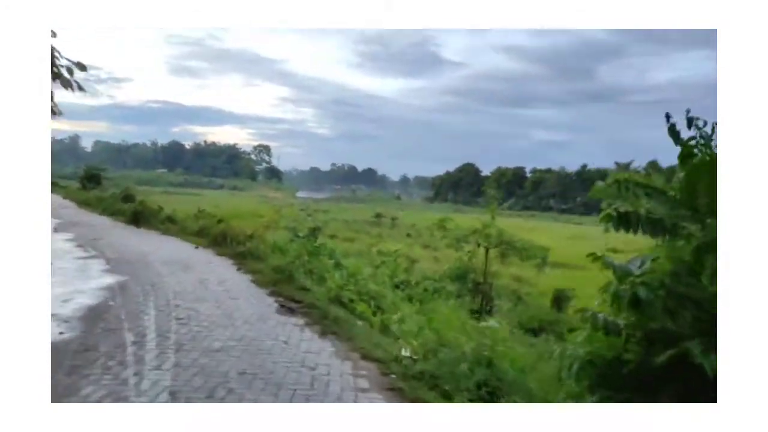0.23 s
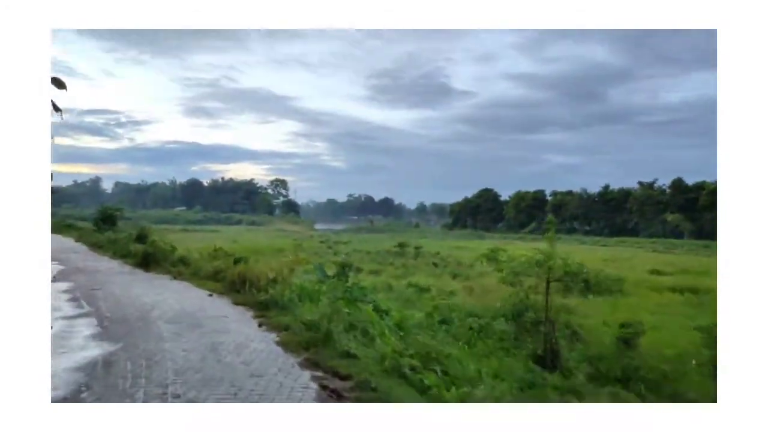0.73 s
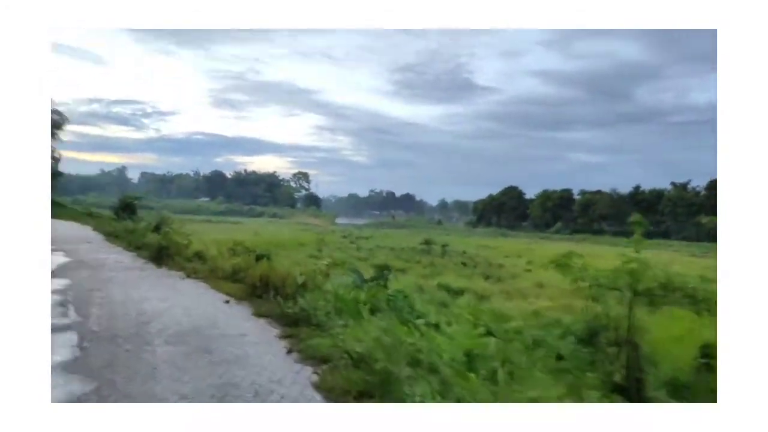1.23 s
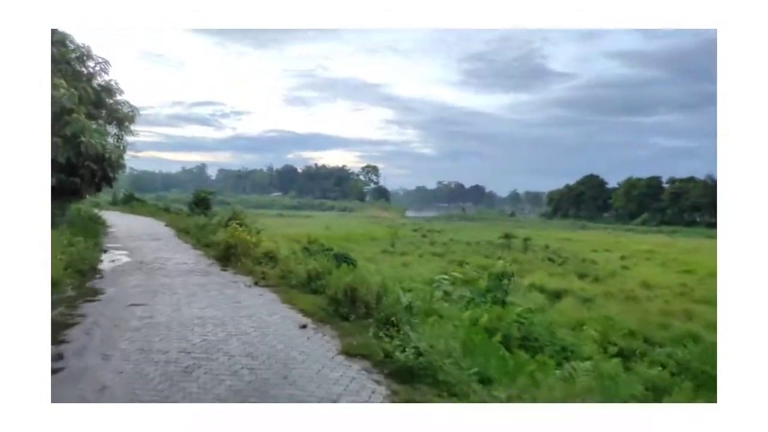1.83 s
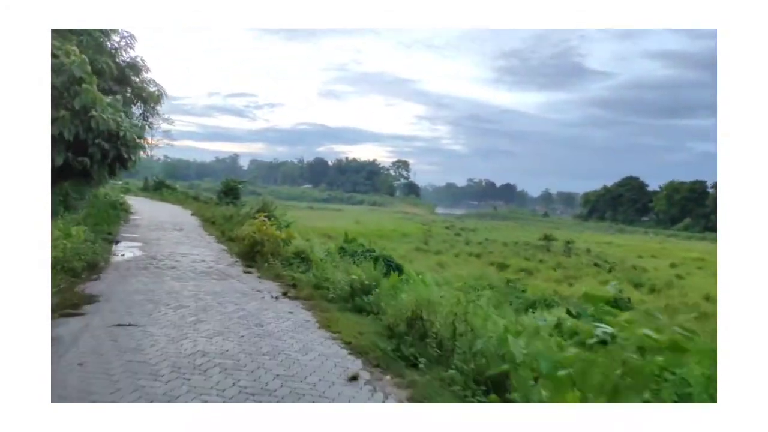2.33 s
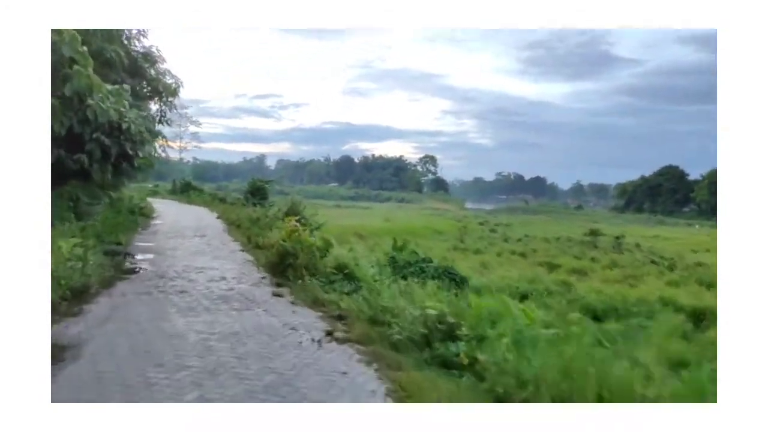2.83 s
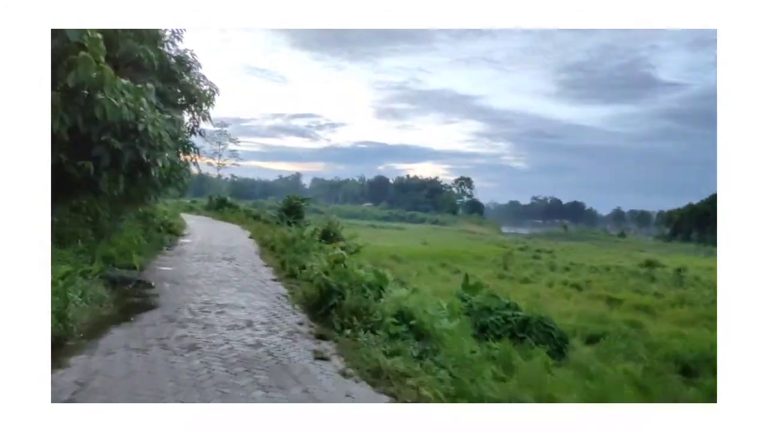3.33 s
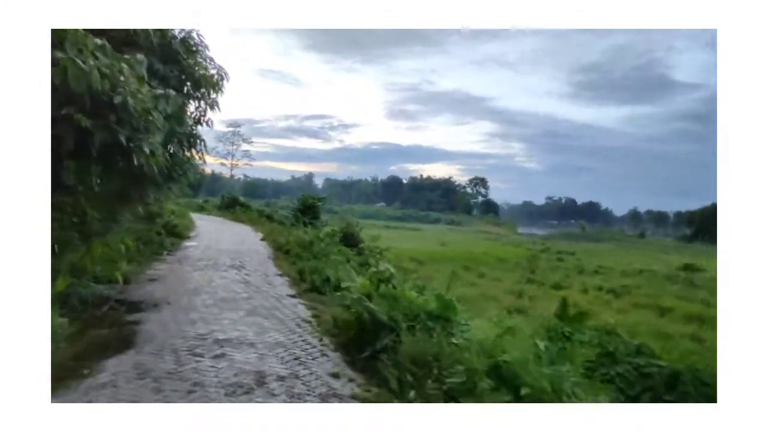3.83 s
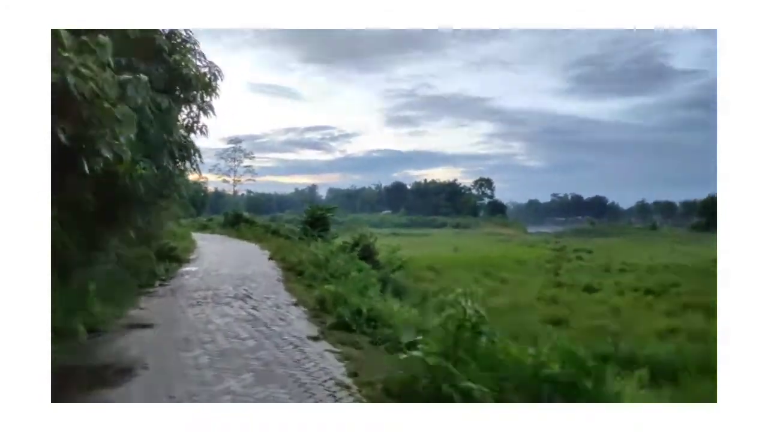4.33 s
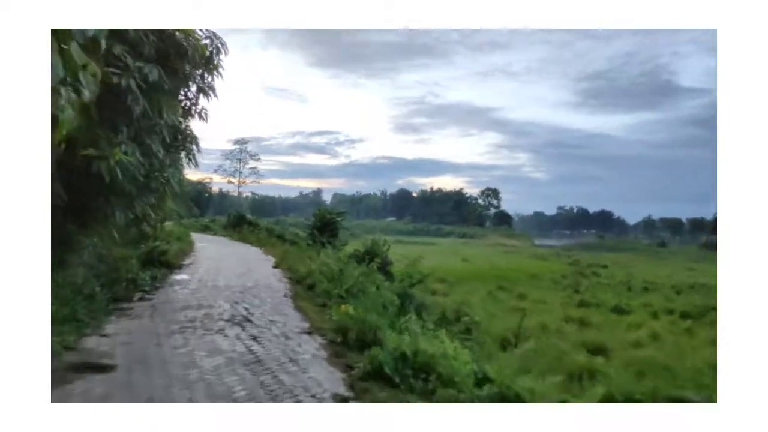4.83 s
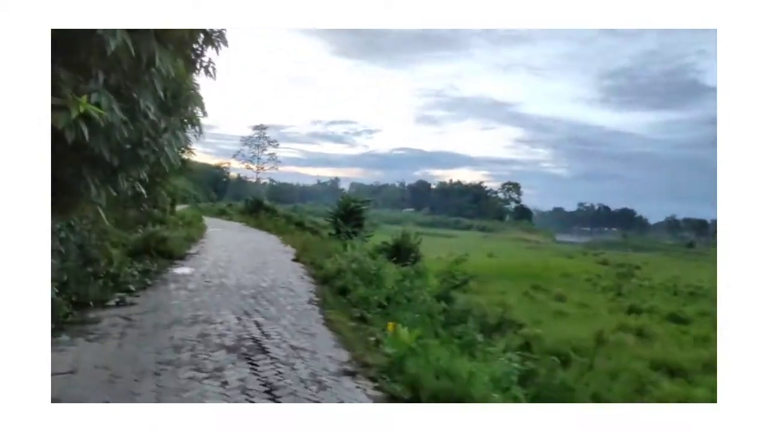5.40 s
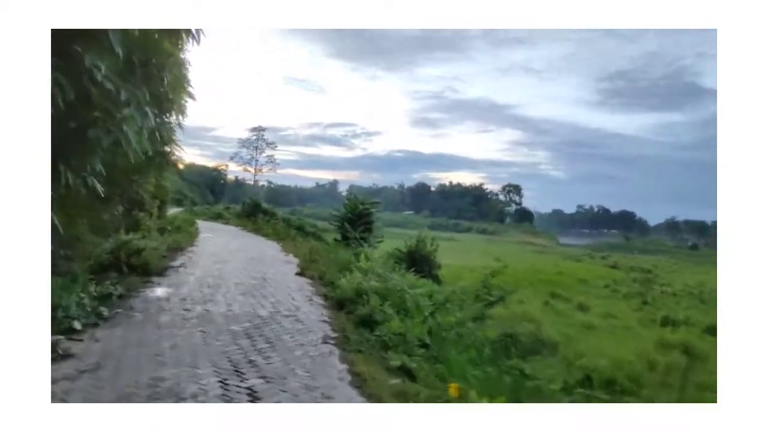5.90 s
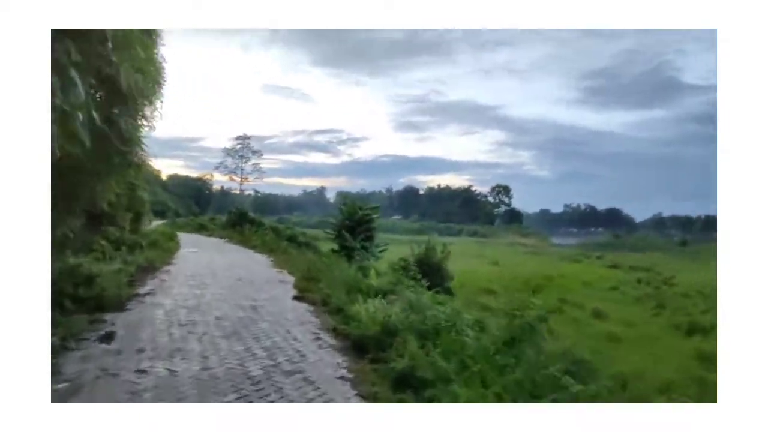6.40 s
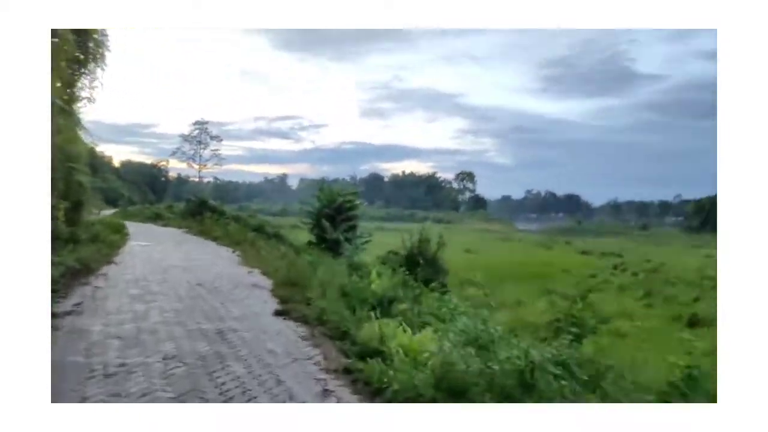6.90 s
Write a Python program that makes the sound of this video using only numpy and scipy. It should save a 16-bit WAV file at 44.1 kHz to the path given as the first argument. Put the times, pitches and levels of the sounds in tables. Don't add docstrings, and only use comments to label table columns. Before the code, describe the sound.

Onboard a little motorbike: low chugging exhaust, clattering engine, shrill insects from the verge and growing wind buffeting, with the engine easing off near the end.

```python
import sys
import numpy as np
from scipy import signal
from scipy.fft import rfft, irfft, next_fast_len
from scipy.io import wavfile
from scipy.ndimage import map_coordinates

SR = 44100
rng = np.random.default_rng(int(sys.argv[2]) if len(sys.argv) > 2 else 0)


def bounce(signal):
    frames = np.transpose(np.atleast_2d(signal))
    limited = np.clip(frames, -1, 1)
    pcm = np.round(limited * 32767).astype(np.int16)
    wavfile.write(sys.argv[1], SR, pcm)


def field_ratio(decibels):
    return 10 ** (np.asarray(decibels, dtype=float) / 20)


N = 315315

# (frequency [Hz], left density [dB per Hz], right density [dB per Hz])
CHORUS = [(4130, -99, -99), (4530, -96, -93.5), (5200, -88.5, -93.5), (5260, -89.5, -92.5),
          (5800, -82, -89.5), (6050, -82.5, -87), (6300, -84.5, -89), (6560, -83.5, -88),
          (6770, -82, -80.5), (7010, -83.5, -83), (7180, -89, -83.5), (7590, -91, -83),
          (8250, -90.5, -93.5)]
# (time [s], low band [dB], high band [dB])
CHOIRS = [(0, -1, -1.1), (2, -0.5, -1.1), (3.5, -.5, -0.28), (5, .5, 0.59), (6.2, 1, 1.5), (6.6, 0, -0.25),
          (7.15, -3.5, 0.17)]
CHOIR_SPLIT_HZ = 6550
# (start [s], end [s], pitch [Hz], left level [dB], right level [dB])
TRILLS = [(-.1, .3, 6860, -56, -60), (1.575, 1.95, 6800, -55, -59), (2.407, 3.298, 6900, -59, -60),
          (2.498, 3.2, 6700, -63, -61), (3.45, 3.95, 6850, -58, -57), (3.951, 4.404, 6600, -57, -69),
          (3.993, 4.754, 6820, -55, -71), (4.855, 5.4, 6850, -56, -67), (5.555, 6.55, 6730, -53.5, -63),
          (5.6, 6.05, 6780, -55, -62), (5.9, 6.55, 6800, -53, -61), (6.6, 7.3, 6720, -58, -65),
          (5.4, 7.3, 3790, -66, -74)]
# (start [s], end [s], pitch [Hz], chirp rate [per s], level [dB])
SOLOISTS = [(-.069, .13, 6380, 29, -57), (.244, .32, 6860, 28.8, -54), (.313, .55, 6860, 28.8, -49),
            (.556, .69, 6860, 28.8, -53), (.62, .93, 6330, 28.9, -56.5), (.937, 1.04, 6310, 28.95, -48.5),
            (1.04, 1.355, 6310, 28.95, -49.5), (1.056, 1.16, 6790, 29.2, -49),
            (1.193, 1.33, 6790, 29.2, -50), (1.33, 1.572, 6800, 29.2, -48.5),
            (1.198, 1.37, 7020, 29.2, -58), (1.369, 1.57, 7020, 29.2, -55), (5.94, 6.32, 6490, 27.2, -52)]
CHIRPS_PER_S, CHIRP_SPREAD_PER_S, SHADE_DB = 31, 2.1, -12

# (time [s], level [dB])
HEADWIND = [(0, -39), (.35, -37.5), (.8, -34.5), (1.1, -39), (1.4, -36), (2, -34.5), (3, -34.5),
            (3.65, -34), (4.3, -32.5), (5, -30.5), (5.6, -32.5), (6.1, -30), (6.45, -29), (6.75, -26.5),
            (7.15, -27.5)]
# (centre [s], half length [s], rise [dB])
GUSTS = [(.3, 0.23, 10), (.98, 0.038, 10), (1.782, 0.031, 16.5), (1.87, 0.084, 7.5), (2.21, 0.021, 7),
         (2.29, 0.046, 10.5), (2.75, 0.063, 9), (3.33, 0.036, 2), (3.87, 0.091, 11.5), (4.55, 0.036, 6),
         (4.86, 0.039, 2), (5.04, 0.034, 4), (5.24, .03, -1), (5.742, 0.0075, 15), (5.82, 0.043, 7),
         (5.97, 0.12, 3), (6.11, 0.012, 14), (6.21, 0.027, 9), (6.53, 0.015, -5), (6.76, 0.039, 5),
         (6.985, 0.035, 6), (7.08, 0.011, 8.5)]
# (centre [s], half length [s], rise [dB])
SIDE_GUSTS = [(1.36, .06, 4), (2, .06, 4), (3.1, .15, 4), (4.75, .15, 3), (5.4, .12, 6), (5.97, .13, 10),
              (6.52, .1, 9.5), (6.78, .06, 11)]
# (frequency [Hz], density [dB per Hz])
THUD_SPECTRUM = [(12, -3.5), (25, -7), (45, -0.5), (80, -0.5), (110, -6), (160, -29), (300, -65)]
# (frequency [Hz], density [dB per Hz])
FLUTTER_SPECTRUM = [(60, -27.5), (100, -0.5), (140, -1.5), (200, -7.5), (300, -13.5), (450, -26),
                    (800, -42), (1500, -73)]
# (frequency [Hz], density [dB per Hz])
LEE_THUD_SPECTRUM = [(10, -20), (24, -2), (45, 0), (65, -5), (90, -13), (150, -23), (300, -38), (1200, -90)]
# (frequency [Hz], density [dB per Hz])
LEE_FLUTTER_SPECTRUM = [(50, -19.5), (90, -1), (160, -1), (280, -6.5), (450, -15.5), (800, -36.5),
                        (1500, -68.5)]
# (time [s], level [dB])
LEE_FLUTTER = [(0, -61.5), (4, -56.5), (5.9, -52), (6.3, -47.5), (7.15, -45)]
# (time [s], peak [dB], pitch [Hz])
PUFFS = [(0.416, -20.5, 130), (0.57, -17, 86), (0.967, -14, 87), (1.783, -7, 147), (2.216, -10.5, 110),
         (2.267, -21, 117), (2.288, -18, 173), (2.728, -20, 87), (2.766, -13.5, 133), (2.927, -20.5, 116),
         (3.029, -16.5, 99), (3.318, -15, 115), (3.369, -16.5, 102), (3.756, -23, 100), (3.783, -19, 116),
         (3.802, -11.5, 98), (3.847, -19, 178), (3.862, -14.5, 116), (4.131, -18, 98), (4.518, -16.5, 150),
         (4.55, -16, 87.5), (4.804, -13, 85), (4.841, -14, 157), (4.879, -13.2, 100), (5.009, -13, 85.6),
         (5.116, -16.5, 111), (5.242, -13.5, 82), (5.561, -15.5, 101), (5.604, -16.5, 116),
         (5.725, -15, 151), (5.745, -9.5, 210), (5.805, -12, 101), (5.927, -17, 116), (5.974, -22, 116),
         (5.997, -15, 153), (6.075, -14.5, 115), (6.102, -7, 99), (6.122, -23, 116), (6.164, -13, 131),
         (6.176, -13.5, 176), (6.206, -12.5, 50.3), (6.229, -13, 181), (6.28, -13.5, 88.5),
         (6.307, -9.5, 122), (6.375, -19, 77), (6.527, -12.5, 100), (6.581, -13.5, 75), (6.654, -19, 76),
         (6.693, -12.5, 57), (6.709, -12, 135), (6.741, -12.5, 136), (6.766, -11.5, 200), (6.822, -10, 102),
         (6.907, -17.5, 76), (6.94, -17, 115), (6.967, -9, 116), (6.987, -14.5, 101), (7.089, -12, 102),
         (.166, -22, 170), (1.772, -16, 140), (5.744, -26, 520), (6.982, -29, 600), (7.062, -20, 225),
          (6.105, -22, 400), (6.002, -14, 60), (6.095, -12.5, 53), (6.38, -17.5, 55), (5.865, -16, 170),
          (6.04, -17, 130), (6.995, -15, 210), (6.997, -30, 480), (7.09, -27, 300), (5.803, -24, 320),
          (6.178, -24, 320), (6.225, -25, 360), (2.78, -26, 400), (2.295, -14, 52), (6.112, -14, 55),
          (6.515, -25, 380), (3.33, -15, 95), (1.5, -20, 150), (6.06, -14, 42), (6.15, -14, 46),
          (6.8, -15, 40), (5.71, -17, 190), (2.75, -17, 150)]
THUD_DB, FLUTTER_DB = 5.5, -1.5
THUD_SHARE = 0.42
LEE_DB, LEE_DB_PER_S = -50, 1.8
EDDY_CYCLES, EDGE_RATIO, EDGE_DB = .95, 1.8, -11.5

# (time [s], firing rate [per s])
FIRING = [(0.0, 20.05), (0.55, 20.7), (1.19, 21.75), (1.8, 22.2), (2.4, 22.55), (3.15, 22.5), (3.42, 23.0),
          (3.76, 22.65), (4.08, 22.9), (4.33, 22.6), (4.8, 23.3), (5.25, 23.75), (5.52, 23.25),
          (6.2, 23.85), (6.35, 23.6), (6.53, 20.0), (6.87, 15.6), (7.15, 14.2)]
# (time [s], level [dB])
THROTTLE = [(0, 1), (.7, .5), (1.3, .4), (3, .3), (4.5, -.3), (5.7, -.3), (6.28, -.3), (6.42, -11),
            (7.15, -17)]
# (frequency [Hz], level [dB], likeness [0-1], phase [rad])
PORTS = [(64, 7, 0.94, -1.5), (384, 1, 0.8, 0.89), (480, 1, 0.6, -0.1), (890, -3.5, 1, -2),
         (1070, -4, 0.8, -1.58), (1604, -16, 0.5, -2), (1624, -14.5, 0.8, -19), (2562, -7, 0.5, 12.5),
         (2873, -0.5, 0.99, -8.5), (3325, 1, 0.11, -1), (3740, 3, 0.1, -2), (8000, 0.5, .05, -6)]
# (frequency [Hz], density [dB per Hz])
ENGINE_AND_TYRES = [(60, -80), (120, -78.5), (165, -78), (225, -75), (300, -73),
                    (380, -72.5), (480, -77), (600, -78.5), (720, -78), (900, -78), (1200, -81.5), (1450, -83.5),
          (1620, -87.5), (2200, -90), (3000, -95), (4800, -99.5), (8000, -112)]
# (frequency [Hz], width [Hz], level against the noise [dB])
PANELS = [(542, 40, -8), (775, 45, -1), (905, 60, -1), (1370, 130, 1), (1525, 20, 10.5), (1730, 90, -1),
          (1890, 60, 1), (2410, 45, -5), (2700, 35, -6), (3540, 180, -7)]
# (centre [s], half length [s], rise [dB])
KNOCK_SWELLS = [(2.6, 1, -2.5), (5.9, 0.68, 1)]
# (multiple of firing rate [-], level [dB], phase wander [turns])
WHINE = [(24, -53.5, .03), (44, -58.5, .2), (85, -65, .15)]
# (frequency [Hz], width [Hz], level [dB])
GEARCASE = [(540, 40, 1), (930, 200, 1.5), (1895, 110, 0)]
# (frequency [Hz], level [dB rms])
EXHAUST_LEVELS = [(10, -80), (40, -50), (65, -53), (88, -40), (110, -45.5), (118, -44), (140, -51), (158, -64),
                  (177, -64),
                  (195, -51), (232, -52), (243, -68), (252, -59), (265, -50.5), (296, -61), (310, -51.5),
            (350, -62), (430, -59.5), (485, -71), (545, -64), (578, -68), (800, -76), (1500, -95),
            (3000, -140)]
# (frequency [Hz], delay [s])
CHAMBERS = [(30, .024), (55, .018), (80, .02), (100, .013), (125, .005), (185, .001), (235, .018),
            (262, .003), (325, .024), (430, .018), (545, .002), (800, .012)]
# (frequency [Hz], width [Hz], level [dB])
TAPPET = [(1527, 26, -62)]
# (centre [s], half length [s], rise [dB])
TAPPET_SWELLS = [(1.35, .3, 5), (2.4, .35, 4.5), (3.15, .15, 5), (3.7, .25, 4), (4.3, .25, 5.5),
                 (6.2, .2, 3)]
TAPPET_LAG_S = .015
COOL_PER_S, HOT_PER_S = 20.4, 22.3
CASING_DB, CASING_DB_PER_DB, CASING_DB_PER_REV = 1.78, 0.15, 0.2
INTAKE_DB_PER_DB = 0.14
KNOCK_DEPTH_PER_DB = .075


def unit(x):
    return x / np.sqrt(np.mean(x ** 2) + 1e-20)


def along(points, hz):
    f, *cols = np.transpose(points)
    return np.squeeze([np.interp(np.log(hz + 1), np.log(f + 1), c) for c in cols])


def curves(rows):
    s, *cols = np.transpose(rows)
    return [np.interp(np.arange(N) / SR, s, c) for c in cols]


def swells(rows):
    t = np.arange(N) / SR
    return sum(db * np.exp(-((t - s) / half) ** 2) for s, half, db in rows)


def wobble(rate):
    return map_coordinates(rng.standard_normal(int(N * rate / SR) + 4), [np.arange(N) * rate / SR])


def filtered(x, response):
    m = next_fast_len(N + SR // 2)
    return irfft(rfft(x, m) * response(np.fft.rfftfreq(m, 1 / SR)), m)[..., :N]


def resonance(modes, f):
    return sum(field_ratio(db) * 1j * f * w / (c * c - f * f + 1j * f * w) for c, w, db in modes)


def hiss(channels):
    return np.sqrt(SR / 2) * rng.standard_normal((channels, N))


def chorus():
    far = filtered(hiss(channels=2), lambda hz: field_ratio(along(CHORUS, hz) - 4.5) * (hz > 4400))
    low = filtered(far, lambda hz: hz < CHOIR_SPLIT_HZ)
    low_db, high_db = curves(CHOIRS)
    song = field_ratio(low_db) * low + field_ratio(high_db) * (far - low)
    return song * field_ratio([wobble(6), wobble(6)])


def trill(start, end, hz, rate, side_db):
    t = np.arange(N) / SR
    stroke = ((t - start) * rate + .035 * wobble(18)) % 1
    swell = np.sin(np.pi * np.clip((t - start) / (end - start), 0, 1)) ** .12
    wing = np.sin(np.pi * np.clip(stroke / .72, 0, 1)) * field_ratio(.8 * wobble(25) - .8)
    pitch_hz = hz * (1 + .018 * (.3 - stroke) + .004 * wobble(90))
    phase = 2 * np.pi * np.cumsum(pitch_hz) / SR
    paths = np.array([np.sin(phase), np.sin(phase + 4.3 * wobble(8.4))])
    return field_ratio(np.array(side_db)[:, None] + 3) * swell * wing * paths


def crickets():
    song = chorus()
    rates = CHIRPS_PER_S + CHIRP_SPREAD_PER_S * rng.standard_normal(len(TRILLS))
    for start, end, hz, rate, db in SOLOISTS:
        song += trill(start, end, hz, rate, [db, db + SHADE_DB])
    for (start, end, hz, *side_db), rate in zip(TRILLS, rates):
        song += trill(start, end, hz, rate, side_db)
    return song


def buffet(spectrum, lumpy_db):
    lumps = field_ratio(lumpy_db * wobble(28))
    return unit(filtered(lumps * hiss(channels=1)[0], lambda hz: field_ratio(along(spectrum, hz))))


def eddies():
    t, out = np.arange(N) / SR, np.zeros(N)
    rows = PUFFS
    for (s, db, hz), turn in zip(rows, rng.random((len(rows), 1))):
        near = slice(max(0, round(s * SR) - SR // 20), round(s * SR) + SR // 10)
        u = (t[near] - s) * hz / EDDY_CYCLES - .4
        roll = lambda v: np.exp(-4 * v ** 2) * np.sin(2 * np.pi * (v * EDDY_CYCLES + turn))
        out[near] += field_ratio(db - 0.5) * (roll(u) + field_ratio(EDGE_DB) * roll(EDGE_RATIO * u))
    return out


def wind():
    t, strength_db = np.arange(N) / SR, curves(HEADWIND)[0]
    gust_db, side_gust_db = swells(GUSTS), swells(SIDE_GUSTS)
    thud_db = strength_db + THUD_DB + THUD_SHARE * gust_db + .7 * wobble(12)
    flutter_db = strength_db + FLUTTER_DB + gust_db + 1.1 * wobble(9)
    left = field_ratio(thud_db) * buffet(THUD_SPECTRUM, lumpy_db=-0.5)
    left = left + field_ratio(flutter_db) * buffet(FLUTTER_SPECTRUM, lumpy_db=1.5) + eddies()
    lee_thud_db = LEE_DB + LEE_DB_PER_S * t + side_gust_db
    lee_flutter_db = curves(LEE_FLUTTER)[0] + 0.56 * side_gust_db
    right = field_ratio(lee_thud_db) * buffet(LEE_THUD_SPECTRUM, lumpy_db=0.0)
    right = right + field_ratio(lee_flutter_db) * buffet(LEE_FLUTTER_SPECTRUM, lumpy_db=1.0)
    return np.array([left, right + field_ratio(-35) * left])


def at_ports(near, other):
    def left(hz):
        db, alike, phase = along(PORTS, hz)
        alike = np.clip(alike, 0, 1)
        return field_ratio(db) * np.array([alike * np.exp(1j * phase), np.sqrt(1 - alike ** 2)])
    return np.array([filtered(np.array([near, other]), left).sum(axis=0), near])


def clatter(cycle, rate, blow_db):
    lost_db = np.minimum(blow_db, 0)
    casing_db = CASING_DB + CASING_DB_PER_DB * blow_db + CASING_DB_PER_REV * (rate - HOT_PER_S)
    knock_db = 2.2 * np.cos(2 * np.pi * (cycle - .63)) + 1.2 * np.cos(4 * np.pi * (cycle - .6))
    knock = field_ratio(knock_db) ** (1 - KNOCK_DEPTH_PER_DB * lost_db)

    ringing = lambda f: field_ratio(along(ENGINE_AND_TYRES, f)) * (1 + resonance(PANELS, f))
    valves = lambda f: ringing(f) / (1 + (1150 / (f + 1)) ** 10) / (1 + (f / 1800) ** 10)
    intake = lambda f: (ringing(f) - valves(f)) / (1 + (2000 / (f + 1)) ** 6)
    steady = lambda f: ringing(f) - valves(f) - intake(f)

    noise = hiss(channels=2)
    knocking = filtered(noise * unit(knock) * field_ratio(swells(KNOCK_SWELLS)), valves)
    intake_db = casing_db + INTAKE_DB_PER_DB * lost_db + .7 * wobble(6)
    return field_ratio(casing_db) * (knocking + filtered(noise, steady)) + field_ratio(intake_db) * filtered(noise, intake)


def gear_whine(cycle, blow_db):
    whine = np.zeros(N)
    for multiple, db, turns in WHINE:
        whine += field_ratio(db + 1.6 * wobble(5)) * np.sin(2 * np.pi * (multiple * cycle + turns * wobble(40)))
    return filtered(field_ratio(blow_db + 3.5) * whine, lambda f: resonance(GEARCASE, f))


def pipe(hz, heat=1):
    turns = np.cumsum(along(CHAMBERS, hz)) * hz[1]
    return field_ratio(along(EXHAUST_LEVELS, hz / heat)) * np.exp(-2j * np.pi * turns)


def valve_cover(f):
    centre_hz, width_hz, _ = TAPPET[0]
    skirt = width_hz / (width_hz + np.abs(f - centre_hz))
    return resonance(TAPPET, f) * skirt * np.exp(-2j * np.pi * f * TAPPET_LAG_S)


def exhaust(cycle, rate, blow_db):
    fired = np.flatnonzero(np.diff(np.floor(cycle - .3 + .002 * wobble(25))) > 0)
    blows = np.zeros(N)
    blows[fired] = (field_ratio(blow_db + .7 * wobble(20)) * SR / rate / np.sqrt(2))[fired]
    hot = np.clip((rate - COOL_PER_S) / (HOT_PER_S - COOL_PER_S), 0, 1)
    cool_pipe = lambda f: pipe(f, COOL_PER_S / HOT_PER_S) / (1 + (f / 330) ** 6) ** .5
    boom = hot * filtered(blows, pipe) + (1 - hot) * filtered(blows, cool_pipe)
    return boom + field_ratio(swells(TAPPET_SWELLS)) * filtered(blows, valve_cover)


def engine():
    rate, blow_db = curves(FIRING)[0], curves(THROTTLE)[0]
    cycle = np.cumsum(rate) / SR
    near, other = clatter(cycle, rate, blow_db)
    return at_ports(exhaust(cycle, rate, blow_db) + near + gear_whine(cycle, blow_db), other)


def scene():
    return crickets() + wind() + engine()


def roll_off(x):
    return signal.sosfilt(signal.butter(12, 8360, fs=SR, output="sos"), x)


def record(dry):
    squeezed = dry / (1 + np.abs(dry / .55) ** 4) ** (1 / 4)
    narrow = filtered(squeezed, lambda hz: 1 / (1 + (hz / 7900) ** 90) / (1 + (hz / 8050) ** 400))
    return roll_off(narrow)


dry = scene()
out = record(dry)
bounce(out)
```